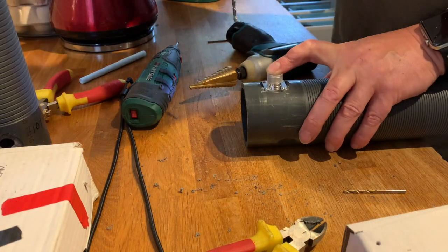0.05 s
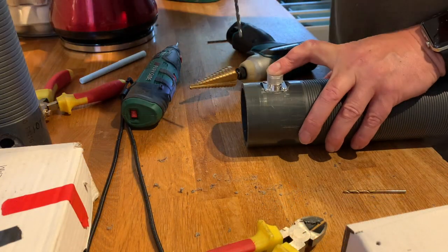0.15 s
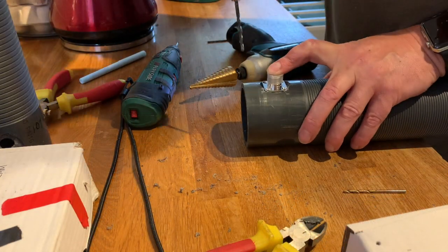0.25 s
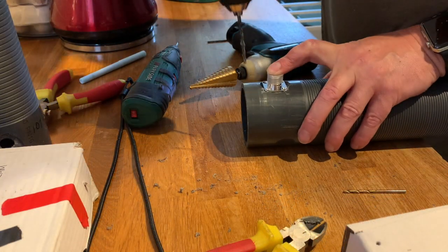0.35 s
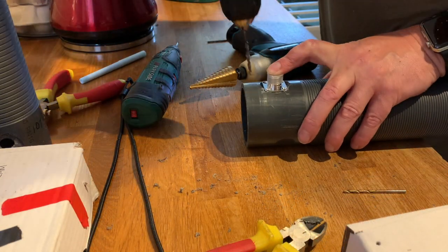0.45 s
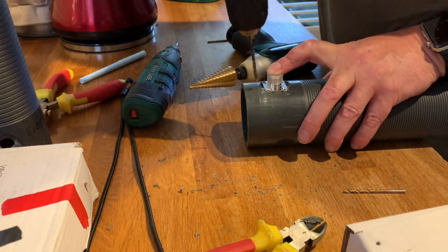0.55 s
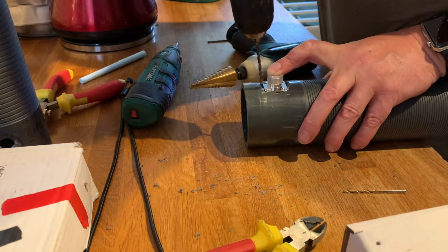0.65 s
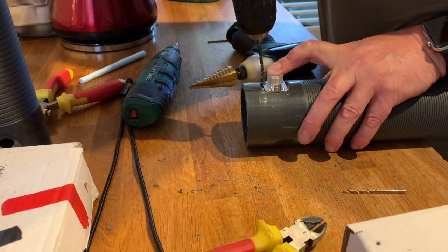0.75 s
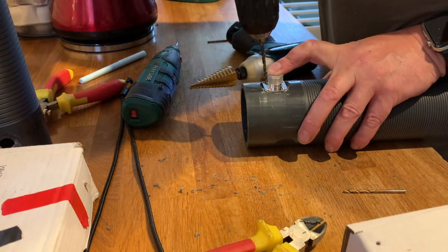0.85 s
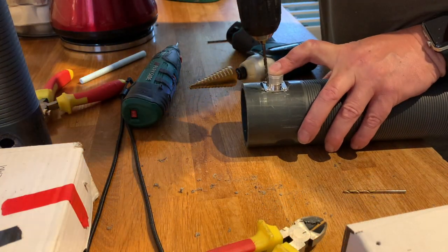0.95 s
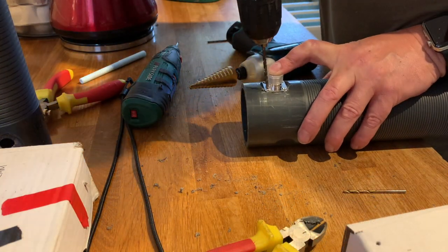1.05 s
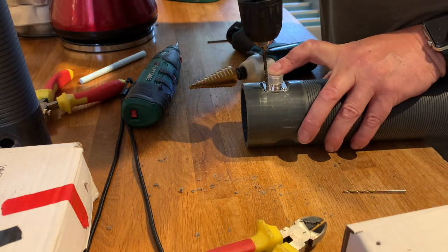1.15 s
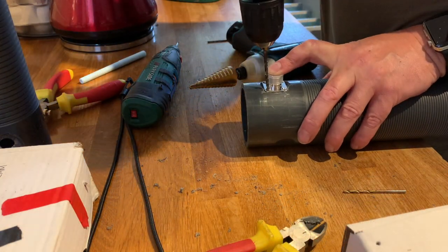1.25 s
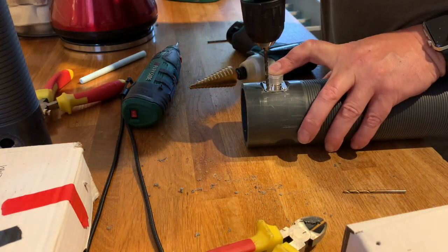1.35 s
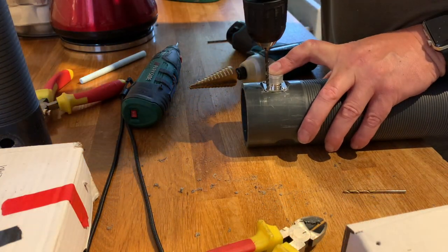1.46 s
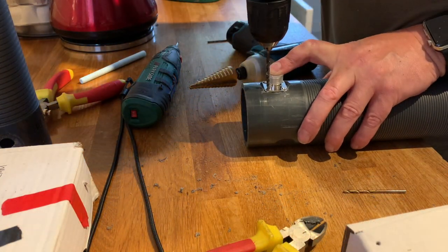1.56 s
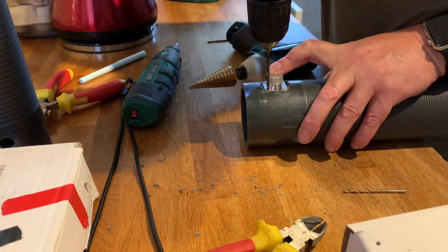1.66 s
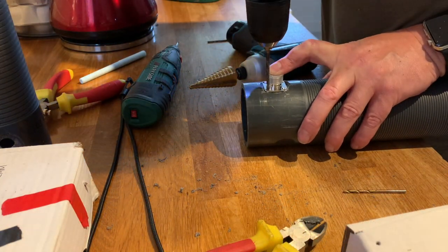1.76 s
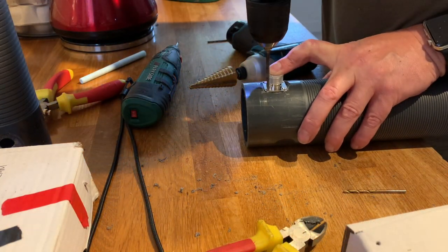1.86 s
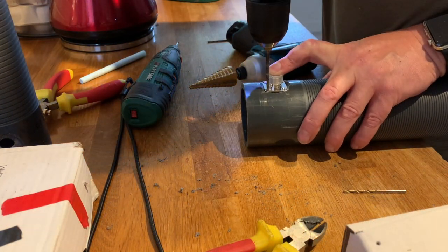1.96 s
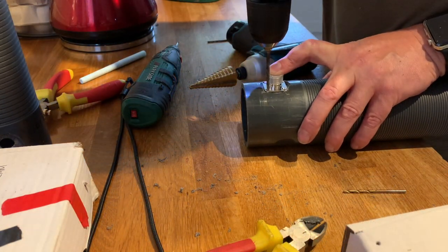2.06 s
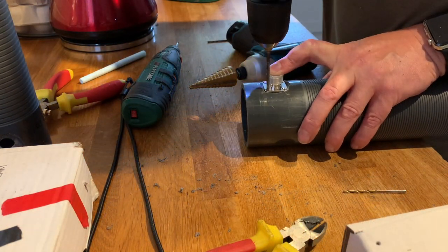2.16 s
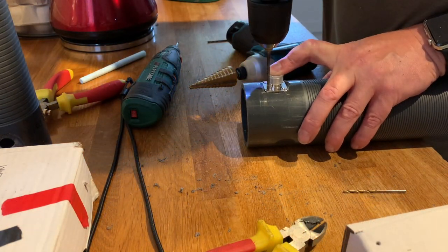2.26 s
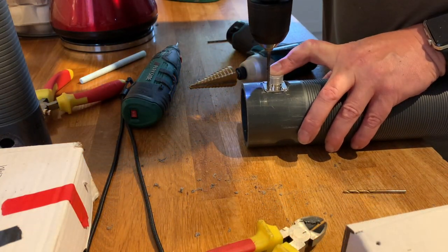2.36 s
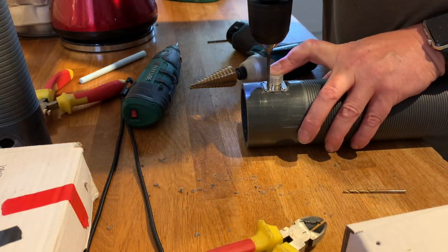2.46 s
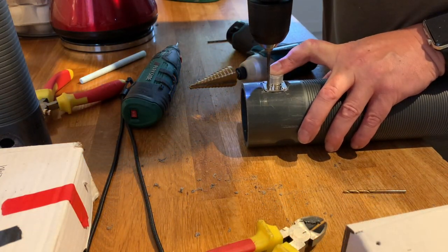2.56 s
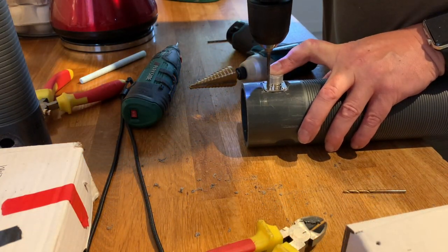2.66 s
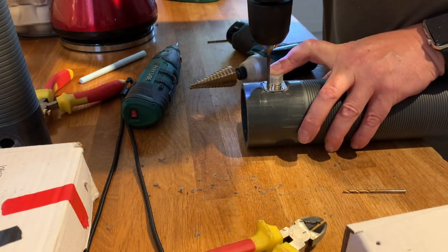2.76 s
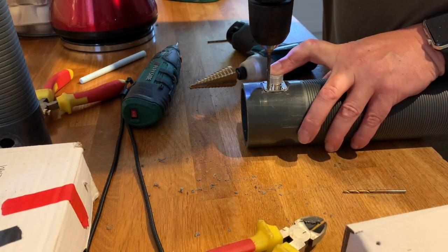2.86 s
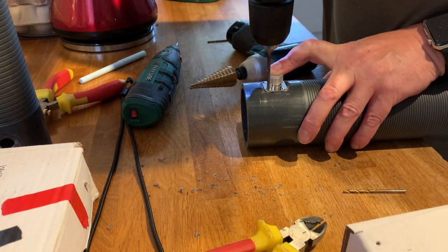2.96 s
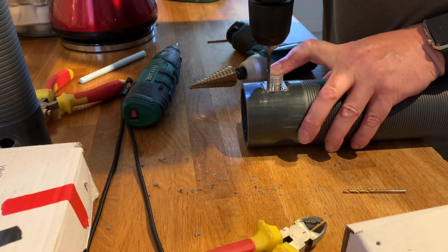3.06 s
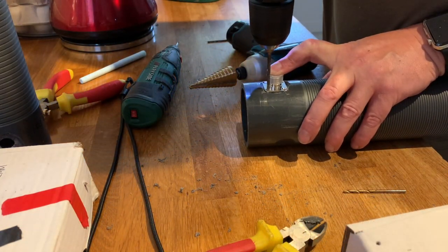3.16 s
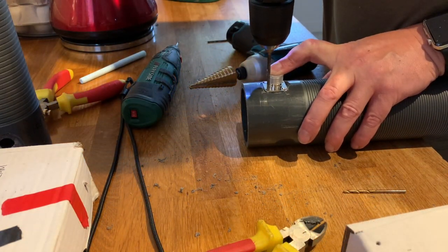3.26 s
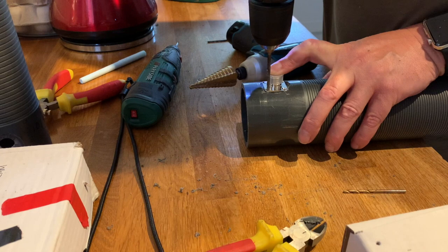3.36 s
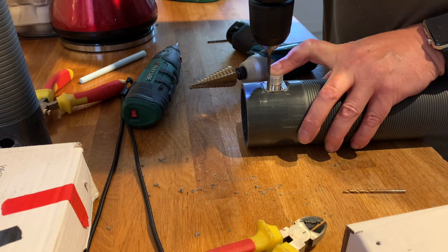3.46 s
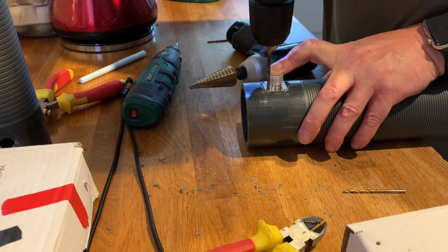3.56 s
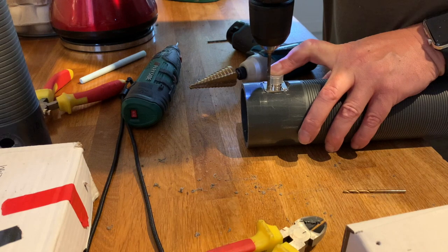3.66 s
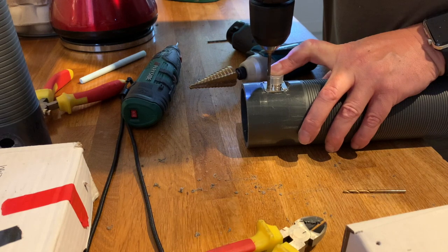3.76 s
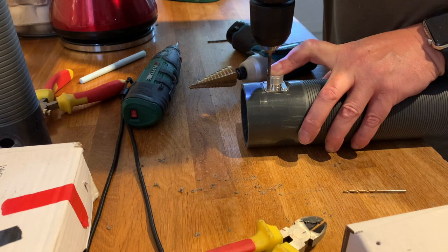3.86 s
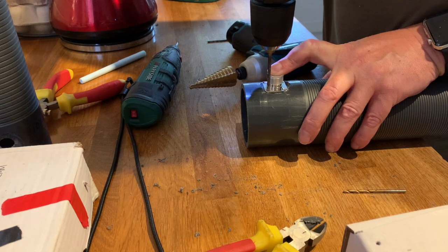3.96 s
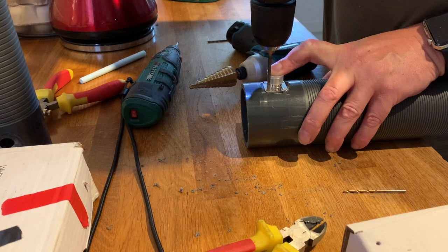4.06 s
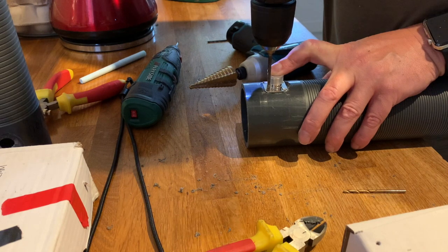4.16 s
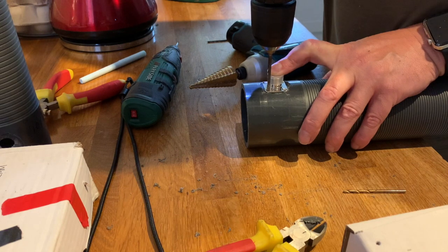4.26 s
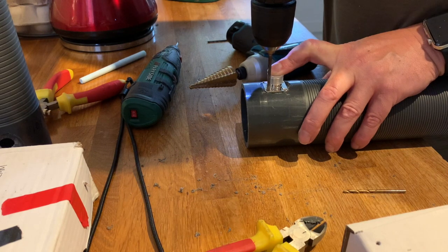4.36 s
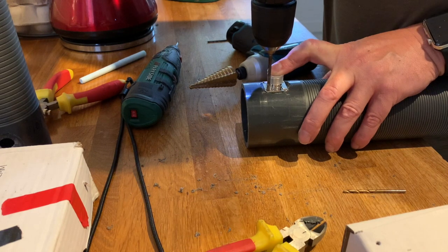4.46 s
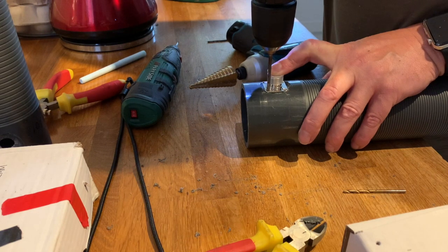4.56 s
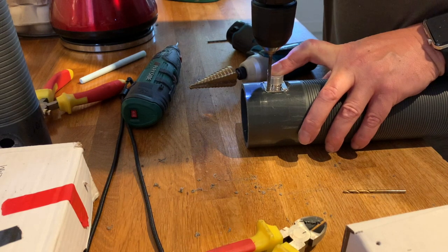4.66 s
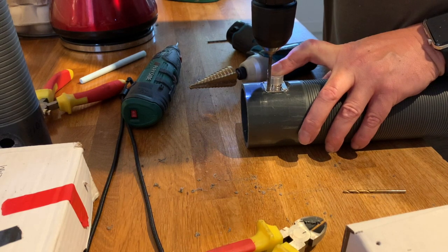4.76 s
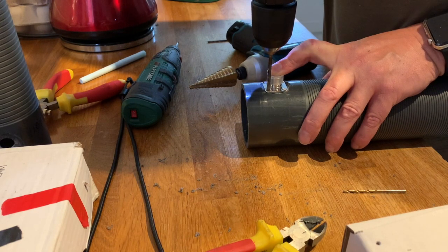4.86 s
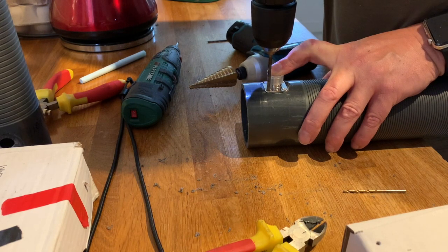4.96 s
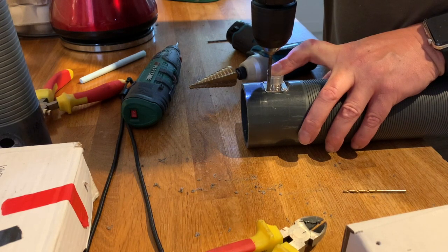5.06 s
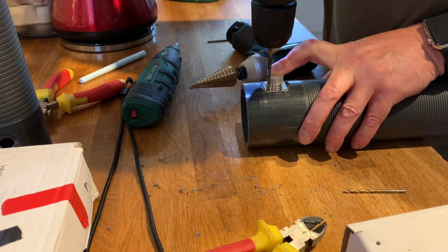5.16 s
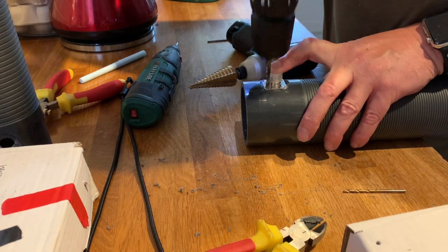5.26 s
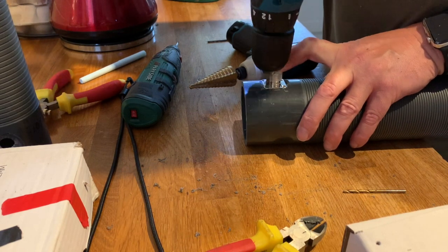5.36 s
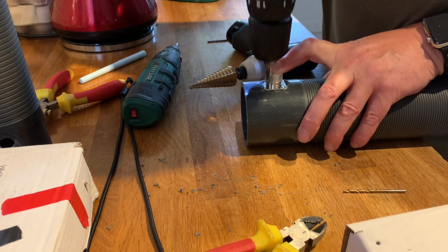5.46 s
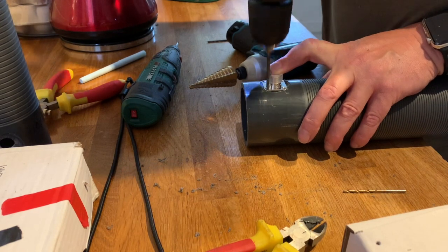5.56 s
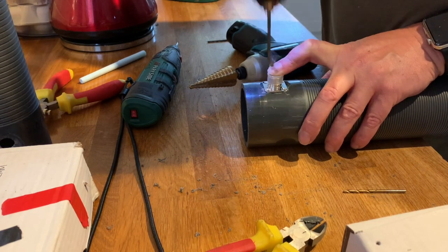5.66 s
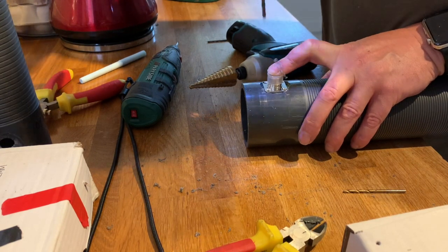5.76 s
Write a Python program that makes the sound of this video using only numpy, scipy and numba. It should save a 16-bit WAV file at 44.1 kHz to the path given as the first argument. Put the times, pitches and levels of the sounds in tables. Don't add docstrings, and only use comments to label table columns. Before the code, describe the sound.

Close indoor stereo phone pickup at a wooden table. Sleeve and small metal parts rustle and squeak faintly, a drill bit taps a hollow plastic pipe, the trigger clicks and a small motor spins up quickly. It whines and hisses steadily with occasional chip catches, then grabs with low thumps and a pipe rattle, clears, and snaps off.

```python
import sys
import numpy as np
from scipy import signal
from scipy.fft import rfft, irfft, next_fast_len
from scipy.io import wavfile
from scipy.ndimage import uniform_filter1d
from numba import njit

SR = 44100
rng = np.random.default_rng(int(sys.argv[2]) if len(sys.argv) > 2 else 0)


def to_wav(s):
    ch = np.atleast_2d(s).T
    pcm = np.round(np.clip(ch, -1, 1) * 32767)
    wavfile.write(sys.argv[1], SR, pcm.astype(np.int16))


def linear_from_db(decibels):
    return 10 ** (np.asarray(decibels, float) / 20)


N = 256220
TIME = np.arange(N) / SR
LONG = next_fast_len(N)
FREQ = np.arange(LONG // 2 + 1) * SR / LONG
ON_S, SETTLED_S, SINK_S, GRAB_S, THROUGH_S, OFF_S = 1.735, 2.45, 3.3, 5.2, 5.6, 5.715
FULL_HZ = 303.2


def unit(x):
    return x / np.sqrt(np.mean(x ** 2))


def curves(table):
    s, *columns = np.transpose(table)
    return [np.interp(TIME, s, c) for c in columns]


def over_hz(table):
    hz, value = np.transpose(table)
    return np.interp(np.log(FREQ + 1), np.log(hz), value)


def ramp(start_s, length_s):
    return np.clip((TIME - start_s) / length_s, 0, 1)


def swells(rows):
    power, t = 1e-12, TIME[::16]
    for s, db, rise_s, fade_s in rows:
        drop = np.where(t < s, (s - t) / rise_s, (t - s) / fade_s)
        power = power + linear_from_db(2 * db - 40 * drop)
    return np.interp(TIME, t, np.sqrt(power))


def walk(rate_hz):
    k = int(SR / rate_hz)
    held = np.repeat(rng.standard_normal(N // k + 1), k)
    return 1.25 * uniform_filter1d(uniform_filter1d(held, k), k)[:N]


def grit(spread_db):
    return rng.standard_normal(N) * linear_from_db(spread_db * walk(900))


def band(x, lo_hz, hi_hz):
    return signal.sosfilt(signal.butter(3, [lo_hz, hi_hz], "band", fs=SR, output="sos"), x)


@njit
def svf(x, hz, width_hz):
    y, b, l, g, k = np.empty(len(x)), 0., 0., 0., 0.
    for i in range(len(x)):
        if i % 16 == 0:
            g, k = np.tan(np.pi * hz[i] / SR), width_hz / hz[i]
        v = (b + g * (x[i] - l)) / (1 + g * (g + k))
        b, l, y[i] = 2 * v - b, l + 2 * g * v, k * v
    return y


def ring(x, hz, width_hz):
    return unit(svf(x, np.full(N, 1. * hz), 1. * width_hz))


GRAB, THROUGH = ramp(GRAB_S + .01, .025), ramp(THROUGH_S - .03, .06)
SUNK_S = np.clip(TIME - SINK_S, 0, GRAB_S - SINK_S)


# t/s, turn f/Hz
SPEED = [(1.74, 170), (1.85, 212), (1.95, 236), (2.05, 241.7), (2.18, 248), (2.3, 270.3), (2.406, 293),
         (2.45, 298.8), (2.536, 302.8), (2.89, 303.1), (3.3, 299), (3.96, 297.1), (4.68, 295.3),
         (5.19, 294.9), (5.49, 298.3), (5.586, 297.1), (5.7, 301.9)]
# t/s, loss/Hz, build-up/s, recovery to a tenth/s
STALLS = [
    (5.23, 5.7, .04, .1),
    (5.336, 10, .09, .15),
]


def motor_speed():
    lost_hz = swells([(s, 20 * np.log10(hz), rise_s, fade_s) for s, hz, rise_s, fade_s in STALLS])
    return curves(SPEED)[0] - lost_hz


def drill():
    hz = motor_speed()
    slow = 1 - hz / FULL_HZ
    rough = np.maximum(.2 + 3.5 * slow ** 2, 0.9 * GRAB)
    wobble_pc = .045 + .07 * (1 - ramp(SETTLED_S, .8)) + .3 * (1 - ramp(SETTLED_S - .3, .3)) + .03 * GRAB
    turn = 2 * np.pi * np.cumsum(hz * (1 + wobble_pc / 100 * walk(30))) / SR
    whine = linear_from_db(3.6 - 40 * ramp(OFF_S, .02)) * lines(hz, turn)
    clean = unbalance_hum(hz, turn, rough) + whine
    noisy = housing_hiss(hz, turn, slow, rough) + pipe_buzz(slow)
    running = ramp(ON_S, 0.0059)
    return running * clean, running * noisy


# turn f/Hz, level/dB
HUM = [(170, -52), (212, -50), (250, -35), (275, -33), (300, -35.5)]
# t/s, level/dB, rise 20 dB/s, fade 20 dB/s
BITES = [(5.232, -36, .04, .025), (5.258, -36, .025, .04), (5.282, -38, .03, .03), (5.315, -37, .03, .03),
         (5.335, -38, .02, .03), (5.365, -34, .035, .04), (5.392, -39, .02, .03), (5.425, -34, .035, .05),
         (5.448, -36, .02, .03), (5.483, -35, .04, .04), (5.518, -34, .03, .05), (5.535, -36, .02, .03),
         (5.552, -32, .03, .03), (5.568, -32, .03, .03)]


def unbalance_hum(hz, turn, rough):
    slip_db = -4.5 * np.exp(-((TIME - 3.52) / .08) ** 2)
    hum_db = np.interp(hz, *np.transpose(HUM)) + slip_db - 14 * GRAB
    gain = linear_from_db(hum_db + .8 * walk(4)) + 1.15 * swells(BITES)
    wobble = unit(svf(svf(rng.standard_normal(N), hz, 73.0), hz, 73.0))
    return gain * linear_from_db(0.9) * (np.sqrt(2 * (1 - rough ** 2)) * np.sin(turn) + rough * wobble)


# multiple of turn, level/dB, sinking slope/(dB/s)
WHINE = [(3, -50, 0), (6, -54, 3), (15, -50, -1), (18, -44, 0), (21, -50, 0), (23, -50, 0), (24, -45, -3),
         (25, -45, -2), (27, -39, 0), (30, -45, 0), (31, -43, 0), (33, -39, 5), (34, -46, -2), (35, -47, 0),
         (36, -39, 0), (37, -47, -5), (38, -44, -1), (39, -36, -4), (40, -46, 0), (41, -40, -3),
         (42, -39, 1), (43, -49, 3), (44, -46, 0), (45, -50, 3), (46, -48, 0), (47, -45, -3), (48, -47, 2),
         (49, -53, 0), (51, -52, 2), (53, -54, 6)]
# multiple of turn, level/dB, sinking slope/(dB/s)
GEARS = [(1.74, -53, 5), (6.85, -53, 1), (8.02, -53, 1), (8.74, -40, 4), (9.33, -48, 2), (11.07, -44, 3),
         (12.03, -51, 1), (13.2, -52, 1), (15.36, -46.5, 2)]
# f/Hz, level/dB
BRUSH_RING = [(200, 0), (740, 4), (900, 0), (5400, 0), (6300, -10), (8000, 0), (9000, -5), (9600, 4),
              (9750, 1), (10000, 0), (10400, 0), (10900, -1), (11700, 3), (12100, 3.5), (12600, 1),
              (13600, -5), (17000, -12)]


def lines(hz, turn):
    ring_hz, ring_db = np.transpose(BRUSH_RING)
    out, t, hz, on = np.zeros(N), TIME[::64], hz[::64], int(ON_S * SR)
    for k, db, slope in [*WHINE, *GEARS]:
        swell_db = np.interp(k * hz, ring_hz, ring_db) - np.interp(k * hz.max(), ring_hz, ring_db)
        sink_db = slope * np.clip(t - 3.9, -.8, .8)
        slow_db = -(k + 24) * (1 - hz / FULL_HZ)
        db = db + sink_db + swell_db + slow_db + 2.4 * walk(5)[::64]
        db = db - 12 * (k % 1 > 0) * (t > GRAB_S + .03)
        tone = np.sin(k * turn[on:] + rng.uniform(0, 2 * np.pi))
        out[on:] += np.interp(TIME[on:], t, linear_from_db(db)) * tone
    return out


# t/s, level/dB
EFFORT = [(1.755, -34), (1.85, -30.5), (2.45, -29), (3.3, -28.5), (5.15, -28.7), (5.21, -28), (5.26, -28.5),
          (5.55, -27.5), (5.63, -32.5), (5.72, -28.5), (5.772, -39), (5.81, -37)]
# f/Hz, level/(dB per Hz)
BODY = [(150, -9.5), (380, -21), (600, -12), (900, -16.5), (1150, -10), (1450, 2.5), (2100, -0.5),
        (3050, -0.5), (4000, -1), (5000, 2.5), (6400, -5.5), (8200, -4.5), (12500, -7), (14500, -6),
        (15600, -6.5)]
# f/Hz, width/Hz, rest level/dB, gain/dB, mesh multiple
HOUSING = [(2150, 420, -26, 20, 9.2), (2600, 200, -27, 5, 8.8), (4580, 300, -32, 24, 18.9),
           (4510, 140, -23, 0, 15), (5375, 90, -32, 18, 18.1), (5495, 60, -34, 15, 18.5),
           (5600, 420, -26, 16.5, 18.8), (11520, 1500, -22, -1, 39)]


def housing_hiss(hz, turn, slow, rough):
    air = grit(2.0) * (1 + 0.31 * np.cos(turn) + 0.21 * np.cos(3 * turn))
    hiss = unit(irfft(rfft(air, LONG) * linear_from_db(over_hz(BODY)), LONG)[:N])
    high = band(hiss, 4800, 17700)
    for f, width_hz, rest_db, gain_db, k in HOUSING:
        near = np.exp(-((k * hz / f - 1) / 0.11) ** 2)
        near = near * (1 - 0.48 * rough) * (1 - .6 * THROUGH)
        centre = np.clip(k * hz, f - 0.4 * width_hz, f + 0.4 * width_hz)
        mode = unit(svf(svf(air, centre, 1. * width_hz), centre, 1. * width_hz))
        hiss = hiss + linear_from_db(rest_db + gain_db * near + 2.2 * walk(45)) * mode
    treble_db = 5.2 + 6 * slow - 1.1 * SUNK_S + 2.5 * (GRAB - THROUGH) - 12 * ramp(OFF_S, .055)
    level_db = curves(EFFORT)[0] + 3.5 + .5 * walk(24.89)
    return linear_from_db(level_db) * (hiss + (linear_from_db(treble_db - 1.4) - 1) * high)


# t/s, table level/dB, pipe level/dB, fade 20 dB/s
CATCHES = [(1.97, -34, -33, .15), (2.25, -36, -37, .12), (2.52, -42, -37, .2), (3.14, -32, -50, .2),
           (3.5, -37, -36, .08), (3.58, -38, -50, .12), (3.75, -39, -50, .1), (3.85, -38, -50, .1),
           (4.45, -38, -50, .08), (4.71, -36, -36, .15), (4.85, -40, -33.5, .2), (5.235, -26, -36, .07),
           (5.37, -31, -40, .2), (5.44, -28, -42, .14), (5.51, -30, -38, .2), (5.63, -40, -40, .15),
           (5.735, -44, -33, .12)]


def pipe_buzz(slow):
    steady_db = -43 + 9 * slow - 1.5 * SUNK_S + 7 * ramp(GRAB_S + .05, .2) + 1.5 * walk(12)
    caught = swells([(s, db, .6 * fade_s, fade_s) for s, _, db, fade_s in CATCHES])
    return np.hypot(linear_from_db(steady_db), caught) * linear_from_db(-1.5) * unit(band(grit(3.7), 457, 974))


def knocks(events, crack, second):
    out, t = np.zeros(N + 8000), np.arange(8000) / SR
    for s, db, hz, t60_s in events:
        fade = np.exp(-np.log(1000) * t / max(t60_s, .004))
        tone = np.sin(2 * np.pi * hz * t) + 0.2 * np.sin(2 * np.pi * second * hz * t)
        burst = unit(band(rng.standard_normal(8000), hz / 2.06, min(2.6 * hz, 16000)))
        start = int(s * SR)
        out[start:start + 8000] += linear_from_db(db) * fade * ((1 - crack) * tone + crack * burst)
    return out[:N]


# t/s, peak level/dB, f/Hz, t60/s
CLICKS = [(1.7144, -25, 2480, 0.018), (1.7234, -28, 1480, 0.018), (1.7324, -14, 2080, 0.018),
          (1.74, -4.5, 2120, 0.01), (5.7245, -20, 1500, .015), (5.7295, -18, 1900, .012),
          (5.7332, -11, 2600, .008), (5.7349, -5.5, 1800, 0.012), (5.7385, -10, 3900, 0.01),
          (5.7448, -14, 1900, 0.015), (5.747, -14, 2300, .02), (5.7525, -21, 2500, .02),
          (5.7605, -23, 2300, .02), (5.7763, -15, 2000, 0.025), (5.778, -15, 3800, .015),
          (5.7855, -24, 4000, .03)]
# t/s, peak level/dB, f/Hz, t60/s
TOUCH = [(.96, -40, 530, .2), (.966, -37, 650, .18), (.962, -33, 1272, .1), (.957, -34, 1696, .16),
         (.957, -33, 2076, .2), (1.03, -44, 1650, .15), (.964, -33, 2175, .08), (.972, -33, 2073, .13),
         (.971, -34, 1285, .07), (.958, -36, 4000, .05), (.975, -40, 3618, .08), (.982, -39, 600, .1),
         (.956, -33, 2632, .14), (.96, -38, 2290, .16)]
# t/s, peak level/dB, f/Hz, t60/s
FLICKS = [(.3282, -30, 14500, .2), (.331, -43, 6500, .09), (.335, -46, 2500, .08), (.457, -42, 7000, .06),
          (.7205, -44, 800, .1), (1.7235, -32, 7500, .02), (5.2295, -22, 450, .03), (5.365, -25, 420, .03),
          (5.422, -27, 420, .04), (5.511, -25, 450, .04), (5.549, -25, 500, .04), (5.566, -25, 450, .04),
          (5.7345, -16, 1300, .09), (5.7335, -22, 2200, .05), (5.7765, -15, 5500, .016),
          (5.7767, -17, 2400, .04)]


def contacts():
    trigger = linear_from_db(-2.0) * knocks(CLICKS, crack=0.59, second=1.2)
    touchdown = knocks(TOUCH, crack=0.35, second=1.3)
    return trigger + touchdown + knocks(FLICKS, crack=1, second=1)


# t/s, peak level/dB, f/Hz, t60/s
THUMPS = [(1.226, -42, 150, .05), (1.247, -34, 62, 0.12), (1.14, -44, 200, .08), (1.33, -40, 180, .08),
          (1.41, -40, 230, .08), (1.978, -34, 240, 0.11), (3.125, -27, 75, .2), (3.13, -31, 170, .1),
          (5.229, -14.5, 105, 0.08), (5.2415, -23, 72, 0.12), (5.34, -25, 90, .14), (5.361, -24, 64, 0.14),
          (5.417, -24, 52, 0.2), (5.474, -23, 62, .25), (5.474, -22, 122, .18), (5.506, -29, 60, 0.2),
          (5.505, -23, 125, .1), (5.54, -30, 58, .16), (5.546, -23, 135, .12)]
# t/s, level/dB, rise 20 dB/s, fade 20 dB/s
NUDGES = [
    (.06, -48, .18, .3),
    (.56, -54, .22, .13),
    (.79, -51, .2, .27),
    (1.23, -43, .26, .9),
    (1.44, -43, .15, .1),
    (1.79, -39, .5, .3),
]


def table():
    noise = grit(1.8)
    low = unit(band(noise, 54, 90)) + 0.55 * unit(band(noise, 108, 175)) + 0.7 * unit(band(noise, 150, 300))
    steady_db = -39.5 - 2.5 * np.clip(TIME - 2.8, 0, 1.5) + 4.5 * ramp(4.6, .6)
    steady_db = steady_db - 10 * ramp(THROUGH_S, .2) + 1.5 * walk(14)
    steady = ramp(ON_S, .1) * linear_from_db(steady_db)
    jolts = swells([*NUDGES, *[(s, db, .6 * fade_s, fade_s) for s, db, _, fade_s in CATCHES]])
    shake = linear_from_db(-5.6) * np.hypot(steady, jolts) * low
    boom = unit(band(rng.standard_normal(N) * linear_from_db(5 * walk(60)), 150, 650))
    thumps = -linear_from_db(-1) * knocks(THUMPS, crack=0, second=2.3)
    room_tone = linear_from_db(-69) * unit(band(noise, 105, 210))
    return shake + linear_from_db(1.5) * swells(BITES) * boom + thumps + room_tone


def scraping(rows):
    return swells([(s, db + over_db, rise_s, fade_s) for s, db, rise_s, fade_s, over_db in rows])


# t/s, level/dB, rise 20 dB/s, fade 20 dB/s, relative scrape level/dB
RUBS = [
    (.05, -45, .3, .2, -5),
    (.55, -66, .3, .2, -10),
    (.722, -50, .006, .14, -10),
    (.865, -61, .3, .13, 3),
    (.966, -56, .012, .07, 14),
    (1.152, -59, .2, .3, -3),
    (1.3, -51, .03, .6, -1),
    (1.49, -57, .05, .6, 6),
    (1.73, -43, .16, .015, 3),
    (5.7, -58, .35, .12, 16),
]


def rubs():
    rub, scrape = unit(band(grit(2.8), 330, 950)), unit(band(grit(3.1), 1030, 3600))
    scrape = scrape + 0.6 * unit(band(scrape, 1100, 1900))
    rubbing = swells([row[:4] for row in RUBS])
    return linear_from_db(6.9) * rubbing * rub + linear_from_db(3.2) * scraping(RUBS) * scrape


# t/s, level/dB, rise 20 dB/s, fade 20 dB/s, relative scrape level/dB
RUSTLES = [(.005, -46, .05, .05, -6), (.033, -36, .012, .05, -10), (.046, -31, .03, .05, -10),
           (.064, -38, .015, .04, -10), (.11, -45, .05, .12, -3), (.155, -50, .1, .14, 0),
           (.336, -46, .008, .4, -14), (.46, -42, .012, .1, -14), (.42, -47, .08, .1, -14),
           (.478, -36, .012, .08, -18), (.498, -33.5, .03, .1, -14), (.515, -32.5, .08, .125, -18),
           (.737, -48.5, .022, .13, -12), (.865, -55, .3, .14, -2), (.966, -57, .008, .07, 0),
           (1.04, -62, .05, .2, -2), (1.16, -58, .03, .14, -2), (1.3, -48.5, .022, .55, -4),
           (1.49, -53, .03, .3, -3), (1.6, -54, .4, .4, -3), (1.73, -36, .035, .012, 4)]
# f/Hz, width/Hz, level/dB
SQUEAK = [(3600, 90, -24), (7200, 150, -15), (9200, 300, -11), (11000, 400, -12)]


def rustles(fine):
    rustling = swells([row[:4] for row in RUSTLES])
    brush = linear_from_db(3.2) * scraping(RUSTLES) * unit(band(fine, 2100, 3800))
    rustle = linear_from_db(-3.0) * rustling * unit(band(fine, 3800, 10600))
    metal = sum(linear_from_db(db + 2.9 * walk(7.35)) * ring(fine, f, width_hz) for f, width_hz, db in SQUEAK)
    sheen = unit(band(fine, 10600, 15700)) + metal
    return brush + rustle + linear_from_db(25) * rustling ** 1.6 * sheen


# t/s, level/dB, rise 20 dB/s, fade 20 dB/s
SQUEALS = [
    (.345, -60, .015, .1),
    (.41, -52, .04, .1),
    (.47, -48, .05, .1),
    (.515, -47, .06, .09),
]
# f/Hz, width/Hz, level/dB
SQUEAL = [(3565, 45, 0), (4790, 45, -12), (6130, 40, -6), (7100, 55, 0)]


def squeals(fine):
    return swells(SQUEALS) * sum(linear_from_db(db) * ring(fine, f, width_hz) for f, width_hz, db in SQUEAL)


def handling():
    fine = grit(3.6)
    return rubs() + rustles(fine) + squeals(fine)


def wander(pair):
    hz, _, both = signal.stft(pair, SR, nperseg=1024)
    turn = uniform_filter1d(rng.standard_normal(both.shape), size=9, axis=1)
    turn = unit(uniform_filter1d(turn, size=9, axis=2))
    reach_rad = .9 * np.clip(hz[:, None] / 700, .1, 1)
    return signal.istft(both * np.exp(1j * reach_rad * turn), SR, nperseg=1024)[1][:, :N]


def room_echo():
    t, t60_s = np.arange(SR // 3) / SR, 0.14
    tails = rng.standard_normal((2, len(t))) * np.exp(-np.log(1000) * t / t60_s) * (t > .002)
    return rfft(tails / np.sqrt(np.sum(tails ** 2, axis=1, keepdims=True)), LONG)


# f/Hz, share/1
LIKENESS = [(60, 0.96), (330, 0.76), (600, 0.43), (1500, 0.37), (3000, 0.39), (6000, 0.43)]
# f/Hz, phase/rad
RIGHT_LAG = [(60, .05), (300, .3), (900, .7), (1150, 3), (2000, 6.3), (3000, 9.45), (4200, 12.6),
             (5200, 15.7), (6200, 18.85)]
# f/Hz, level/dB
LEFT_OVER_RIGHT = [(300, 0), (1400, 2.5), (2000, 1), (3800, 0), (5400, -5.5), (6300, 2)]


def scene():
    clean, noisy = drill()
    clicks = contacts()
    direct = np.clip(over_hz(LIKENESS), 0, 1)
    lag = np.exp(-1j * over_hz(RIGHT_LAG) * np.array([[0], [1]]))
    balance = linear_from_db(over_hz(LEFT_OVER_RIGHT) * np.array([[.5], [-.5]]))
    echoed = np.sqrt(direct) * lag + np.sqrt(1 - direct) * room_echo()
    scrambled = echoed / (np.abs(echoed) + .05) ** .8
    noises = irfft(balance * rfft(noisy + handling(), LONG) * scrambled, LONG)[:, :N]
    roomy = rfft(table() + 0.45 * clicks, LONG) * echoed
    near = rfft(clean + 0.39 * clicks, LONG) * lag
    return wander(noises) + irfft(balance * (roomy + near), LONG)[:, :N]


def low_pass(x):
    return signal.sosfilt(signal.butter(12, 16820, fs=SR, output="sos"), x)


def record(dry):
    treble_hz, turn_hz, band_hz, low_hz, top_hz = 6170, 4790, 345, 44, 15740
    hz, _, both = signal.stft(dry, SR, nperseg=2048)
    hz = hz[:, None]
    angle = np.pi * (hz - treble_hz) / turn_hz
    banded = np.pi * ((hz // band_hz + .5) * band_hz - treble_hz) / turn_hz
    flicker = uniform_filter1d(rng.standard_normal((SR // band_hz, both.shape[2])), size=3, axis=1)
    least = .31 + .12 * flicker[(hz[:, 0] // band_hz).astype(int)] * 1.9
    mid = np.cos(angle) * (np.abs(np.cos(banded)) > least)
    side = -1j * np.sin(angle) * ((np.abs(np.sin(banded)) > least + .09) | (hz < 8000))
    share = np.clip((hz - treble_hz) / 600 + .5, 0, 1)
    spread = both[0] * np.array([mid + side, mid - side])
    wide = both * np.sqrt(1 - share) + spread * np.sqrt(share)
    wide = signal.istft(wide * (hz < top_hz), SR, nperseg=2048)[1][:, :N]
    wide = signal.sosfilt(signal.butter(4, low_hz, "high", fs=SR, output="sos"), wide)
    return low_pass(wide)


dry = scene()
out = record(dry)
to_wav(out)
```